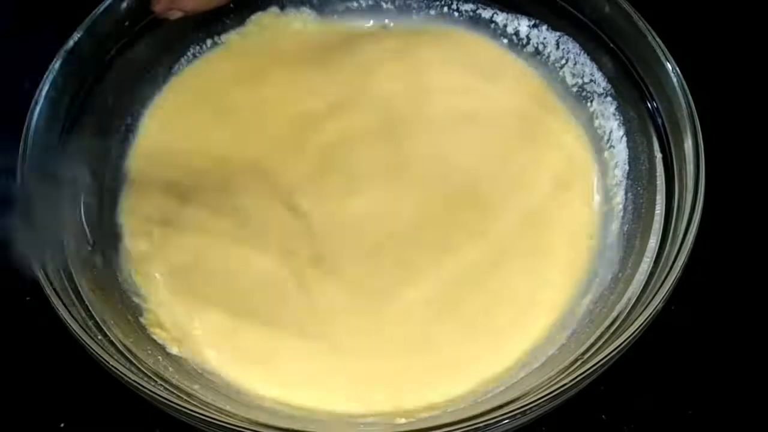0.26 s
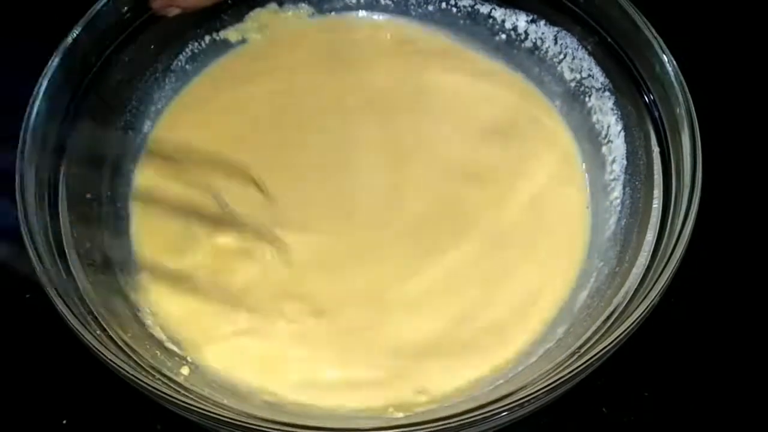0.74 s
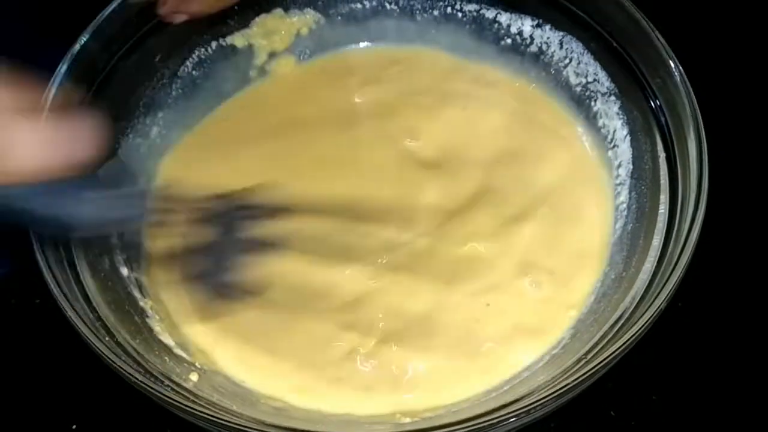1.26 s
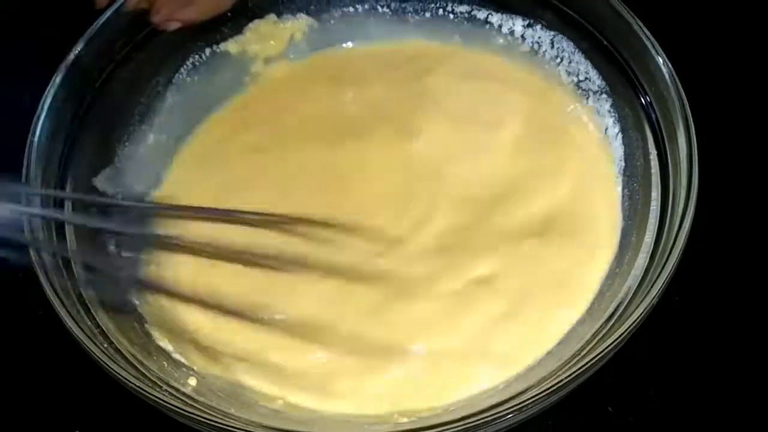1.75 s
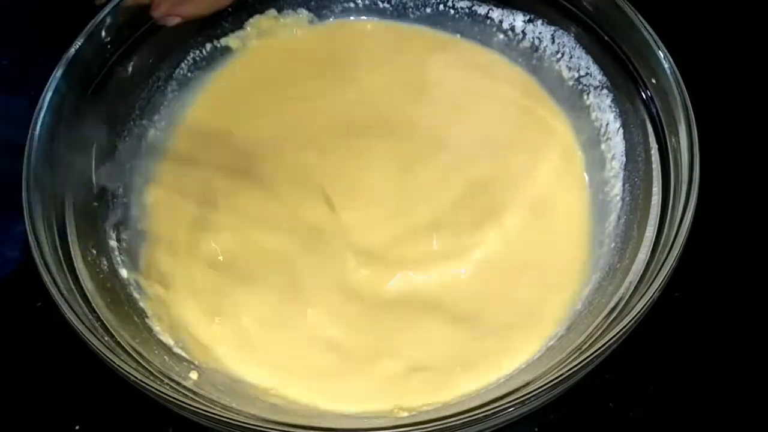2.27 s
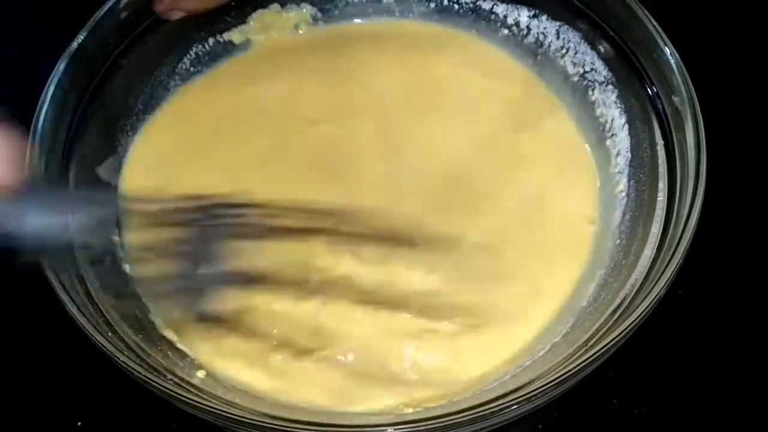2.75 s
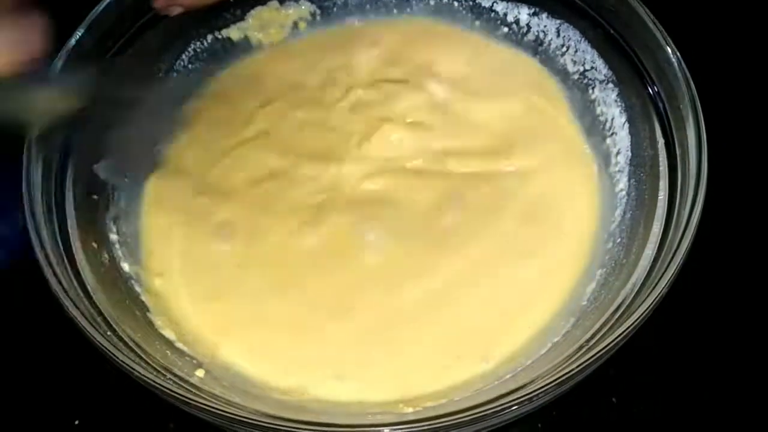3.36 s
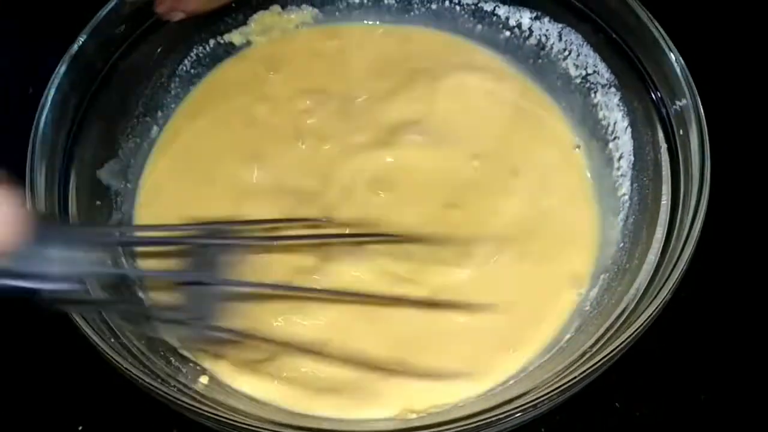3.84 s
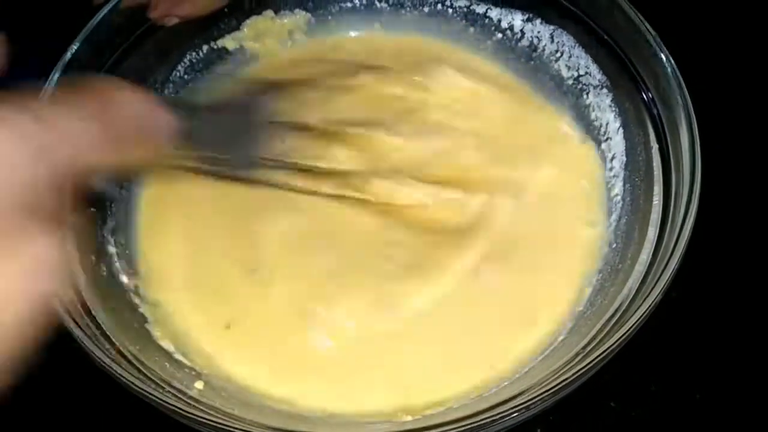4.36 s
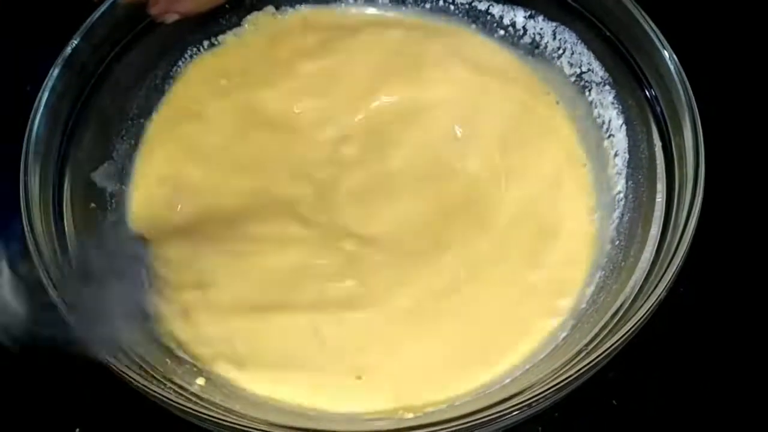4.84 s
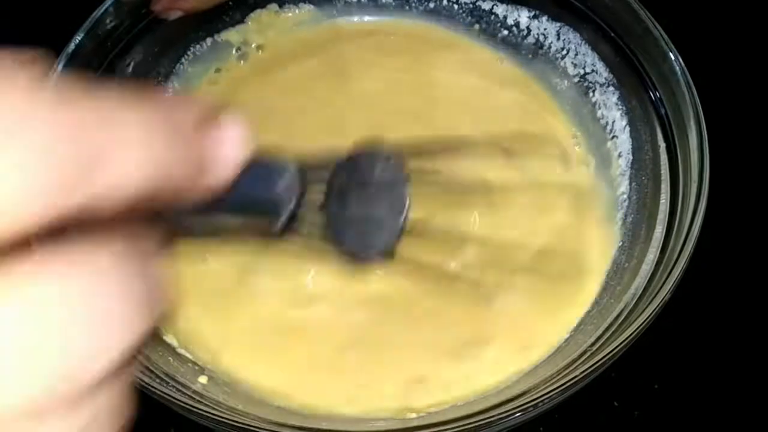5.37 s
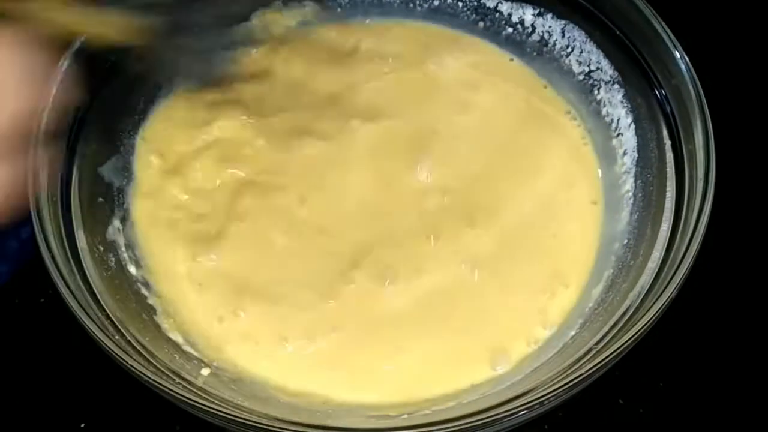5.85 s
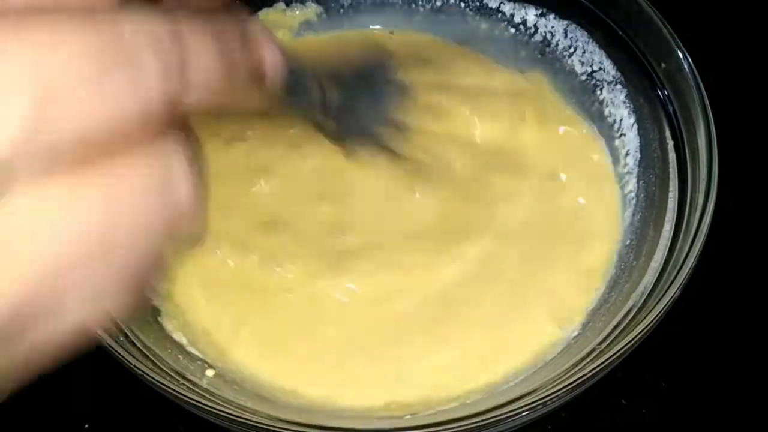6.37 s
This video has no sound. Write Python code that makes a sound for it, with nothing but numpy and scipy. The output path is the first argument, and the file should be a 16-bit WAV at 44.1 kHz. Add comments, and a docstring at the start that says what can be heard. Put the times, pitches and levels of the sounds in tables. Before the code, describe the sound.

Close, uneven ticks and gritty scrapes of a whisk on a glass bowl, with soft batter squelches in a quiet kitchen.

```python
"""A wire whisk beats thin batter in a glass bowl, close to a small microphone in a quiet kitchen.
The wires drag along the glass, land on it in short clusters and ring. The damped bowl sounds single low
notes, the batter plops and squelches, and the counter rumbles when the bowl shifts. Behind them lie
short echoes and faint room tone; a noise suppressor lowers the quietest bands."""
import sys
import numpy as np
from scipy import signal
from scipy.io import wavfile
from scipy.ndimage import uniform_filter1d

SR = 44100
rng = np.random.default_rng(int(sys.argv[2]) if len(sys.argv) > 2 else 0)


def to_wav(sig):
    """Store sig (one row per channel, or 1-D mono) as 16-bit WAV at the path in sys.argv[1].

    Samples outside -1..1 are clipped; the rate is SR.
    """
    pcm = np.clip(np.atleast_2d(sig), -1, 1) * 32767
    pcm = np.round(pcm).astype(np.int16)
    wavfile.write(sys.argv[1], SR, pcm.T)  # frames by channels


N = 291234


def gain_of(db):
    return 10 ** (np.asarray(db) / 20)


def curve_at(points, hz):
    freqs, values = np.transpose(points)
    return np.interp(np.log(hz + 1), np.log(freqs + 1), values)


def unit_energy(x):
    return x / np.linalg.norm(x)


def add(mix, start_s, sound):
    part = mix[round(start_s * SR):][:len(sound)]
    part += sound[:len(part)]


def colour(x, spectrum):
    """Causal filter of energy 1: the phase follows from the log gain."""
    db = np.maximum(curve_at(spectrum, abs(np.fft.fftfreq(8192, 1 / SR))), -90)
    response = np.exp(np.conj(signal.hilbert(np.log(gain_of(db)))))
    taps = np.fft.ifft(response).real[:4096]
    return signal.oaconvolve(x, unit_energy(taps))[:N]


def resonate(x, hz, width_hz):
    """Shifts the pitch down to zero, smooths, and shifts back: a resonance of gain 1."""
    turn = np.exp(2j * np.pi * np.cumsum(hz * np.ones(len(x))) / SR)
    pole = np.exp(-np.pi * width_hz / SR)
    return 2 * (turn * signal.lfilter([1 - pole], [1, -pole], x / turn)).real


def decay(impulses, tau_s):
    return signal.lfilter([1], [1, -np.exp(-1 / (tau_s * SR))], impulses)


def pop_swells(rows, rise_db, fade_db, pops_per_s, width_hz, pitch_ratio, step_db):
    """Random pops swell and fade, ringing at the row's pitch and more faintly at four steps around it."""
    out = np.zeros(N)
    for start, length, top_db, hz, top_at in rows:
        progress = np.linspace(0, 1, round(length * SR))
        db = top_db + np.interp(progress, [0, np.clip(top_at, 0, 1), 1], [rise_db, 0, fade_db])
        pops = rng.standard_normal((5, SR // 2)) * (rng.random((5, SR // 2)) < pops_per_s / SR)
        rung = 0
        for step, train in zip(range(-1, 4), pops[:, :len(db)]):
            pitch = hz * pitch_ratio ** step
            ring = resonate(resonate(train, pitch, width_hz), pitch, width_hz)
            rung += gain_of(step_db * abs(step)) * ring
        add(out, start, gain_of(db) * rung / (rung.std() + 1e-12) * signal.windows.tukey(len(db), 0.2))
    return out


# The kitchen's background at the microphone. Each row: frequency in Hz, relative level in dB.
ROOM_SPECTRUM = [(18, -27.5), (30, -16.5), (125, 4), (235, -12), (608, -6.5), (1120, -16), (2400, -16.5),
                 (4650, -25), (7090, -21.5), (8990, -29.5), (14100, -24), (16500, -21.5)]
def room_tone():
    """Faint, steady noise, mostly low."""
    return gain_of(-75) * colour(rng.standard_normal(N), ROOM_SPECTRUM)


# Strokes along the glass. Each row: start in seconds, length in seconds, level in dB.
SCRAPES = [(0, 0.07, -49), (.075, 0.057, -55), (0.169, .1, -60), (0.336, .14, -57.5), (0.646, 0.16, -78.5),
           (.82, 0.18, -58), (1.063, 0.11, -61), (1.288, 0.14, -63), (1.522, 0.056, -70),
           (1.648, 0.045, -57.5), (1.69, .1, -54), (2.061, 0.3, -54.5), (2.334, .2, -50),
           (2.667, 0.11, -58.5), (2.836, 0.097, -63), (3.086, 0.19, -52), (3.56, 0.18, -48),
           (3.926, 0.068, -56), (4.093, 0.17, -66), (4.26, .12, -72), (4.602, .1, -50), (4.952, 0.19, -54),
           (5.148, 0.09, -45), (5.29, .14, -61.5), (5.62, 0.083, -74.5), (5.687, 0.32, -59.5),
           (6.084, 0.089, -68), (6.147, 0.15, -54), (6.353, 0.047, -55), (6.47, .13, -62)]
def wire_drag():
    """The wires stick and slip in each scrape and after each landing: gritty hiss, with singing loops."""
    starts, db, skid_db = np.transpose(LANDINGS)[:3]
    landings = np.zeros(N)
    np.add.at(landings, np.round(starts * SR).astype(int), gain_of(db + skid_db) ** 2)
    # a quick skid, then a fainter long glide
    power = decay(landings, tau_s=0.02) + gain_of(-18) ** 2 * decay(landings, tau_s=0.049)
    rise_s, lift_s, fade_db = 0.019, 0.028, -10
    for start, length, level_db in SCRAPES:
        t = np.arange(0, length, 1 / SR)
        edges = np.clip(np.minimum(t / rise_s, (length - t) / lift_s), 0, 1)
        add(power, start, (gain_of(level_db + fade_db * t / length) * edges) ** 2)
    skips_per_s, sing_width_hz = 700, 41
    skips = gain_of(3.5 * np.minimum(rng.exponential(1, N), 3)) * (rng.random(N) < skips_per_s / SR)
    pressure = 2.4 + decay(skips, tau_s=0.002)
    level = np.sqrt(abs(uniform_filter1d(power, 100)))
    slip = rng.standard_normal(N) * pressure / np.sqrt(np.mean(pressure ** 2)) * level
    sing = sum(gain_of(mode_db) * resonate(slip, hz, sing_width_hz) for hz, mode_db, _ in LOOP_MODES)
    sing *= np.sqrt(SR / (2 * np.pi * sing_width_hz))  # makes up for the narrow band
    hiss = colour(slip, TREBLE_SPECTRUM) + gain_of(-7) * colour(slip, MID_SPECTRUM)
    return hiss + gain_of(-10.5) * sing


# Wire on glass from close by, in three layers. Each row: frequency in Hz, relative level in dB.
TREBLE_SPECTRUM = [(3000, -20.5), (4000, -13), (4700, -16.5), (5500, -4), (6100, -6.5), (7350, 2.5),
                   (7900, -3), (8700, -8.5), (10100, -13.5), (11300, -15), (15500, -21.5), (16500, -38)]
MID_SPECTRUM = [(500, -12.5), (900, -3), (1400, -0.5), (1950, -2.5), (2450, 3), (2900, 3.5), (3500, 5.5),
                (4300, -5), (5500, 1)]
THUMP_SPECTRUM = [(20, -18.5), (60, -3), (150, -3), (300, -7), (450, -3.5), (700, 2), (1000, -10),
                  (1500, -25)]
# Wires landing. Each row: start in seconds, level in dB, then skid, mids and ring in dB from that level.
LANDINGS = [(0.071, -30, -28, -11.5, -23), (0.181, -48, -23, -3, -25), (.194, -43, -14.5, -3, -27),
            (0.207, -36.5, -36, -8, -31), (.342, -60.5, -11, -18, -24), (0.366, -38, -17.5, -14, -27),
            (0.3851, -35, -45, -3, -25), (0.8092, -28, -31, -10, 3), (0.853, -48, -9, -18, 6),
            (.893, -42.5, -12, -16, -12), (.93, -40, -24, -24, -2), (1.022, -53, -19, -16, -28),
            (1.0551, -40, -40, 2, -25), (1.0632, -34.5, -28, -16, -6), (1.089, -48, -29, 3, -25),
            (1.136, -45.5, -29, -10, -29), (1.238, -56.5, -20, -25, -25), (1.292, -45, -20, -22, -25),
            (1.2996, -40.5, -12.5, -27, -22), (1.398, -55.5, -26, 2, -25), (1.519, -60.5, -10.5, 6, -25),
            (1.543, -54, -24, 4, -25), (1.674, -13, -19.5, -14, -3), (1.6785, -16.5, -24, -2.5, -1.5),
            (1.684, -32, -24, -15, -13), (1.933, -53, -16, -30, -28), (2.074, -43, -34, -28, -28),
            (2.083, -30, -20.5, -32, -8), (2.179, -33, -14, -33, -27), (2.296, -42.5, -11.5, -28, -28),
            (2.3126, -24, -8.5, 0, -27), (2.316, -15, -22, -13, -22), (2.326, -17.5, -25, -9, -33),
            (2.534, -45.5, -15, -21, -28), (2.6649, -30.5, -17.5, -5.5, -29), (2.834, -48, -9, -3, -17),
            (2.981, -55.5, -11.5, -1, -25), (3.043, -43.5, -19, -9, -15), (3.0605, -21, -20.5, -2, -25),
            (3.09, -29, -15, 1, -25), (3.1608, -18.5, -22, -7, -22), (3.2782, -36, -16, -4, -34),
            (3.48, -25, -19.5, -13, -37), (3.5417, -12.5, -20.5, -23, -28), (3.55, -16, -32, -17, -25),
            (3.5579, -13, -36, -4, -31), (3.657, -31, -32, -5, -20), (3.8179, -34, -13.5, -7, -22),
            (3.914, -12, -18, -15, -16), (3.929, -15, -21.5, -3, -34), (4.0851, -18.5, -19.5, -14, -9.5),
            (4.2409, -21.5, -13, -2, -22), (4.246, -15, -18, -4.5, -34), (4.295, -27.5, -35, -9, -21),
            (4.431, -34, -20.5, -11.5, -23), (4.4781, -23, -27, -14, -21), (4.4801, -30, -28, -10, -28),
            (4.495, -30, -14.5, -25, -31), (4.581, -22.5, -28, -27.5, -29), (4.587, -13.5, -23, -9.5, -27),
            (4.6486, -23, -27.5, -3, -25), (4.811, -39.5, -39.5, -7, -20), (4.8226, -33, -31.5, -6, -23),
            (4.83, -18.5, -24, -7.5, -26), (4.912, -27.5, -22, -17, -24), (4.92, -17.5, -22.5, -26, -15),
            (4.9319, -10.5, -21.5, -16, -31), (4.9372, -15, -21.5, -10, -20),
            (5.002, -18, -29.5, -11.5, -24), (5.132, -37, -19, -10, -25), (5.1371, -6.5, -27.5, -11.5, -16),
            (5.147, -30.5, -25, -10, -27), (5.2813, -35.5, -20.5, -5, -26), (5.369, -31, -43, -7, -22),
            (5.6176, -59, -14.5, 5, -14), (5.6968, -38, -24, -13.5, -3), (5.7148, -36.5, -16, -26, -25),
            (5.7574, -30.5, -23, -34, -20), (5.7721, -28, -28, -34, -7), (5.797, -29.5, -15.5, -28, -3.5),
            (5.8202, -32.5, -20, -8, -23), (5.855, -33, -21.5, -7, -28), (5.872, -42, -24, 3, -25),
            (5.9304, -41, -26, 4, -28), (6.134, -19.5, -19.5, -1, -22), (6.141, -23.5, -22.5, 0.5, -26),
            (6.247, -30.5, -15.5, -11, -25), (6.3524, -31.5, -22.5, -9, -20),
            (6.4587, -35.5, -12.5, -33, -7), (6.502, -35, -31, -21, -29), (6.574, -41, -26, -14, -27)]
def wire_ticks():
    """Several wires land within a few ms: a lumpy burst of treble and mids over a soft push of the bowl."""
    treble, mid, thump = np.zeros((3, N))
    t = np.arange(2000) / SR
    rise_s, cluster_s = 0.0016, 0.0031
    for start, db, _, mid_db, _ in LANDINGS:
        noise, lumps = rng.standard_normal((2, len(t)))
        envelope = (1 - np.exp(-t / rise_s)) * np.exp(-t / cluster_s)
        burst = noise * gain_of(20 * uniform_filter1d(lumps, 40)) * envelope
        burst *= gain_of(db - 8) / np.sqrt(np.max(uniform_filter1d(burst ** 2, 40)))
        add(treble, start, burst)
        add(mid, start, gain_of(mid_db) * burst)
        push_db = min(-41 + 0.83 * db, -49)  # grows more slowly than the tick, up to a ceiling
        add(thump, start + 0.0013, gain_of(push_db) * np.hanning(60))
    return colour(treble, TREBLE_SPECTRUM) + colour(mid, MID_SPECTRUM) + colour(thump, THUMP_SPECTRUM)


# The whisk's loops. Each row: pitch in Hz, relative level in dB, seconds to fall 60 dB.
LOOP_MODES = [(3375, -18, .045), (4220, -21, .04), (5685, -15, .06), (7260, 0, .06), (7680, -10, .06),
              (11160, -17, .04)]
def loop_rings():
    """The loops ring at fixed pitches, damped by the batter; each landing shares its blow out anew."""
    out, t = np.zeros(N), np.arange(SR // 8) / SR
    modes = np.array([gain_of(db - 60 * t / t60) * np.sin(2 * np.pi * hz * t)
                      for hz, db, t60 in LOOP_MODES])
    attack = 1 - np.exp(-t / 0.0011)
    shares = gain_of(2 * rng.standard_normal((len(LANDINGS), len(LOOP_MODES))))
    for (start, db, _, _, ring_db), share in zip(LANDINGS, shares):
        add(out, start + 0.001, gain_of(db + ring_db) * attack * (share @ modes))
    return out


# Short notes, mostly batter plops. Each row: start in seconds, level in dB, pitch in Hz,
# seconds to fall 60 dB.
PLOPS = [(.075, -59, 1930, 0.12), (.385, -48.5, 1570, 0.041), (0.81, -44, 520, 0.049),
         (1.676, -41, 324, 0.065), (2.019, -61, 1090, .06), (2.08, -57.5, 596, 0.053),
         (2.959, -58.5, 1470, .033), (3.003, -51.5, 2640, 0.039), (5.14, -41.5, 285, 0.055),
         (5.287, -54.5, 1473, .1), (5.37, -52, 1300, 0.096), (5.601, -62.5, 1277, 0.11),
         (5.731, -49, 1980, 0.088), (5.869, -43, 870, .034), (5.884, -38, 534.5, 0.14)]
# The damped bowl. Each row: pitch in Hz, seconds to fall 60 dB.
BOWL_MODES = [(614, 0.31), (1390, 0.17), (2645, 0.082)]
# Knocks on the bowl. Each row: start in seconds, lowest mode's level in dB, step per mode upward in dB.
KNOCKS = [(.178, -51, -8), (.2, -59, 0), (0.351, -85, 14), (2.459, -58, -7), (6.46, -48, -3)]
def plops_and_knocks():
    """Each plop or bowl mode is a tone shaken by a short rub, so it wavers while it dies."""
    out, t = np.zeros(N), np.arange(SR // 3) / SR
    attack = 1 - np.exp(-t / 0.00092)
    bowl_notes = [(start, db + k * step_db, hz, t60)
                  for start, db, step_db in KNOCKS for k, (hz, t60) in enumerate(BOWL_MODES)]
    for start, db, hz, t60 in bowl_notes + PLOPS:
        rub = resonate(rng.standard_normal(len(t)), hz, width_hz=89)
        tone = np.sin(2 * np.pi * hz * t) + 0.5 * rub / rub.std()
        add(out, start, gain_of(db - 60 * t / t60) * attack * tone)
    return out


# The bowl shifting. Each row: start and length in seconds, top level in dB, pitch in Hz,
# place of the top as a share of the length.
BOWL_SHIFTS = [(0.629, 0.16, -61.5, 79.5, 0.33), (1.519, 0.11, -65.5, 131.5, 0.24),
               (2.201, 0.17, -63, 93, 0.23), (3.83, 0.23, -57.5, 112, 0.38),
               (4.2, 0.35, -44.5, 129.4, 0.27), (5.95, 0.084, -65, 83, .3), (6.169, 0.23, -47, 206, 0.27)]
def counter_rumble():
    """The bowl's foot judders on the counter."""
    return pop_swells(BOWL_SHIFTS, rise_db=-13.5, fade_db=-16, pops_per_s=150,
                      width_hz=50, pitch_ratio=1.4, step_db=-6)


# Batter between the wires. Each row: start and length in seconds, top level in dB, bubble pitch in Hz,
# place of the top as a share of the length.
SQUELCHES = [(2.99, 0.082, -54, 1360, 1), (3.4, .14, -50, 1176, 0.99), (3.812, 0.026, -49, 1114, 0.18),
             (4.47, 0.084, -54, 1540, 0.13), (5.85, 0.04, -46, 1404, 1), (6.585, 0.029, -49.5, 1470, 0.33)]
def batter_squelch():
    """Air pockets close in the batter."""
    return pop_swells(SQUELCHES, rise_db=-17.5, fade_db=-11.5, pops_per_s=330,
                      width_hz=320, pitch_ratio=1.35, step_db=-4.5)


def moving_contact(x, drift_db):
    """The contact moves round the bowl, so the colour drifts in patches from moment to moment."""
    bands = signal.stft(x, nperseg=256, noverlap=192)[2]
    patches = uniform_filter1d(rng.standard_normal(bands.shape), 4, axis=0)
    patches = uniform_filter1d(patches, 40, axis=1)
    bands *= gain_of(drift_db * patches / patches.std())
    return signal.istft(bands, nperseg=256, noverlap=192)[1][:N]


# The kitchen around the microphone. Each row: frequency in Hz, seconds to fall 60 dB.
KITCHEN_DECAY = [(250, 0.31), (1500, 0.23), (5000, 0.18), (12000, 0.13)]
def kitchen_echoes(x):
    """Sparse echoes of random sign, each band dying at its own speed."""
    out, slots = np.zeros(N), np.arange(200, SR // 2 - 20, 20)
    for k in range(3):
        taps = np.zeros(SR // 2)
        taps[slots + rng.integers(0, 20, len(slots))] = rng.choice([-1., 1.], len(slots))
        hz, t, bands = signal.stft(taps, SR, nperseg=256)
        bands *= gain_of(-60 * t / curve_at(KITCHEN_DECAY, hz)[:, None])
        tail = signal.istft(bands, SR, nperseg=256)[1]
        # three tails take turns 30 times a second, so the decay sounds smooth, without ringing pitches
        share = np.sqrt(2 / 3) * np.cos(np.pi * (np.arange(N) / SR * 30 + k / 3))
        out += signal.oaconvolve(x * share, unit_energy(tail))[:N]
    return out


def scene():
    """One microphone close to the bowl, with the kitchen well behind the direct sound."""
    clatter = moving_contact(wire_ticks() + wire_drag(), drift_db=1.5) + batter_squelch()
    tones = loop_rings() + plops_and_knocks()
    background = room_tone()
    echoes = gain_of(-8.5) * kitchen_echoes(clatter + gain_of(-3.5) * tones)
    return (clatter + tones + echoes + counter_rumble() + background)[None]


def record(dry):
    """After the microphone, a noise suppressor lowers bands near silence and a low-pass trims the top."""
    threshold_db, max_cut_db, edge_hz = -103, 14, 15950
    bands = signal.stft(dry, nperseg=512, noverlap=384)[2]
    power = uniform_filter1d(uniform_filter1d(abs(bands) ** 2, 25, axis=1), 7, axis=2)
    level_db = 10 * np.log10(power + 1e-16)
    bands *= gain_of(np.clip(0.56 * (level_db - threshold_db), -max_cut_db, 0))
    suppressed = signal.istft(bands, nperseg=512, noverlap=384)[1][:, :N]
    lowpass = signal.firwin(255, edge_hz, window=("kaiser", 9), fs=SR)
    return signal.oaconvolve(suppressed, lowpass[None], "same")


dry = scene()
out = record(dry)
to_wav(out)
```